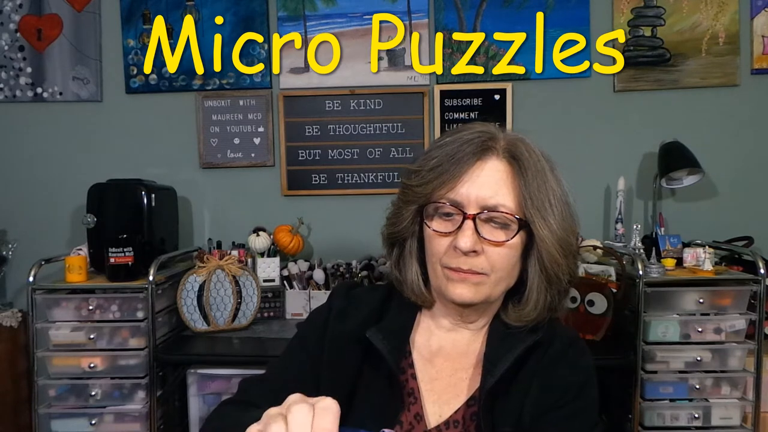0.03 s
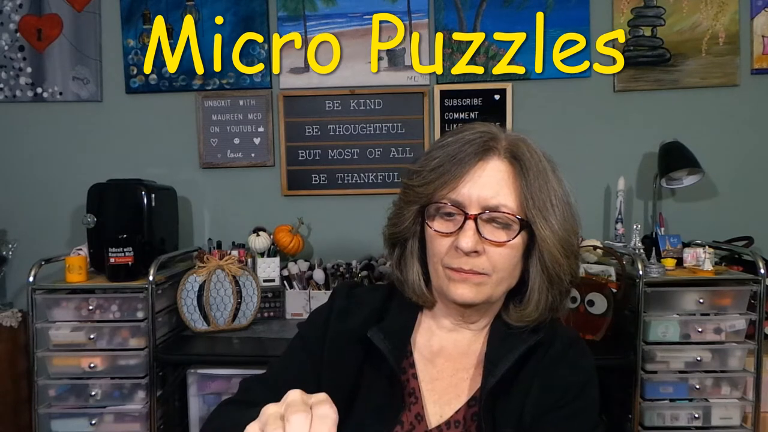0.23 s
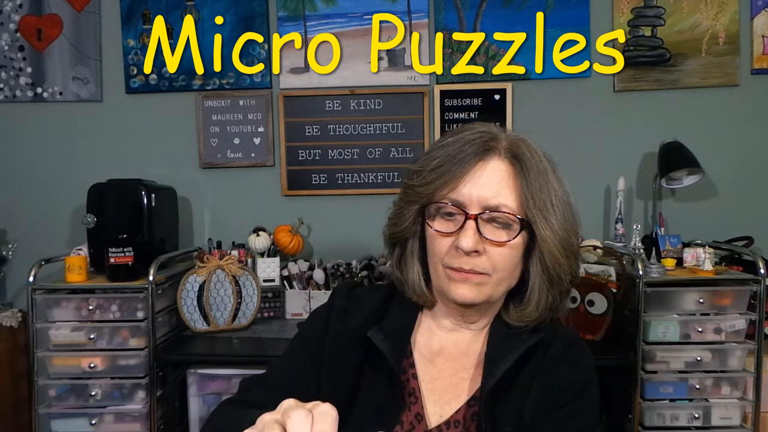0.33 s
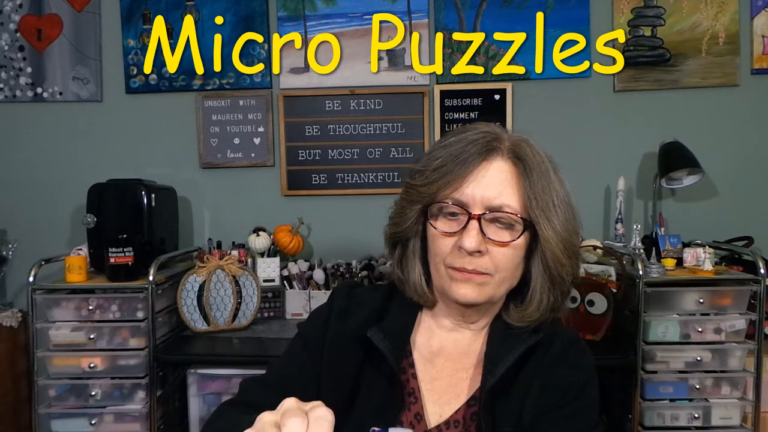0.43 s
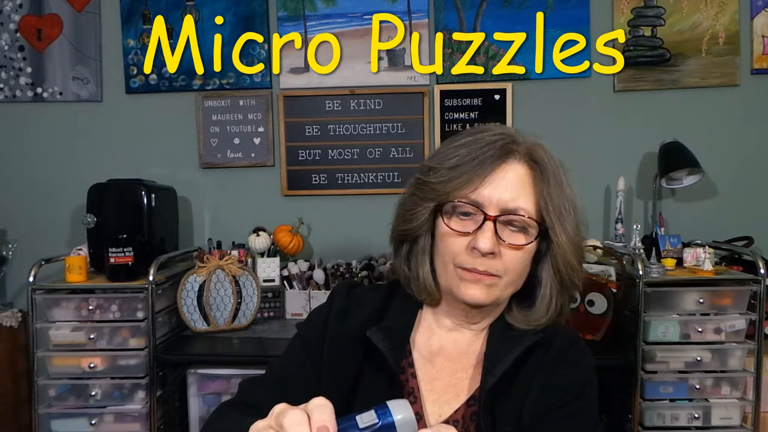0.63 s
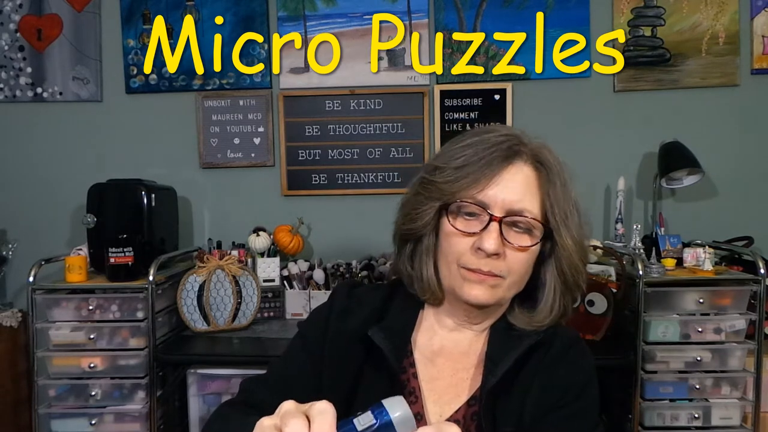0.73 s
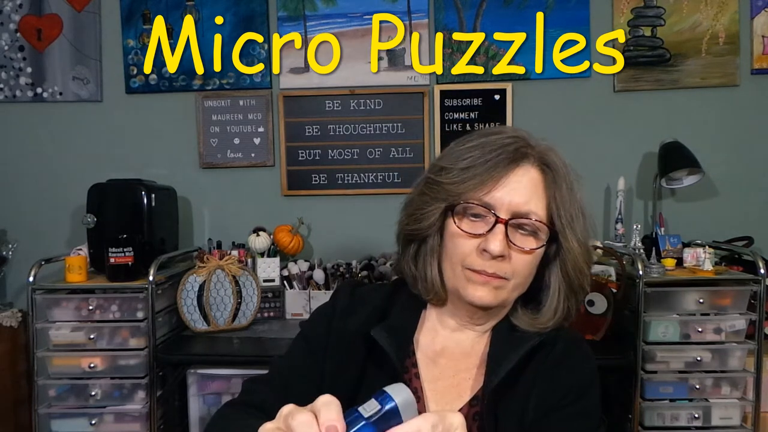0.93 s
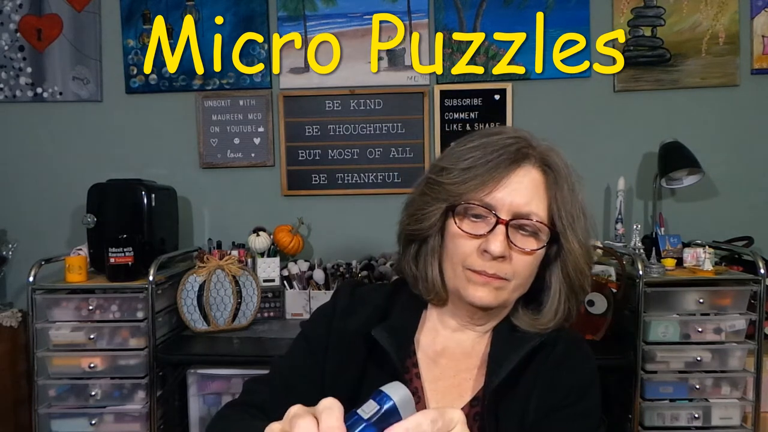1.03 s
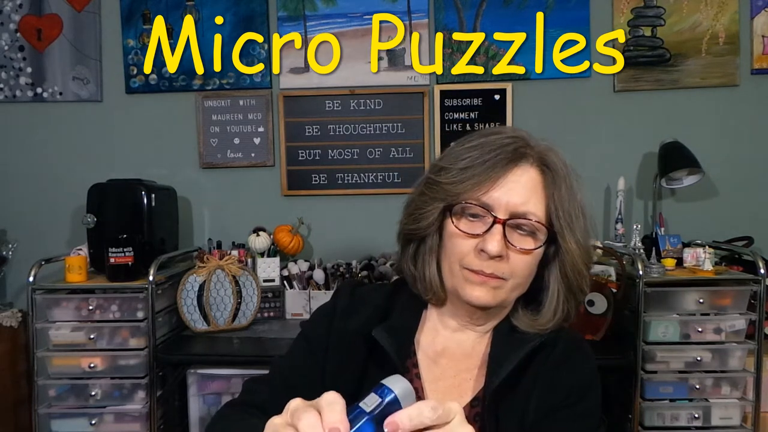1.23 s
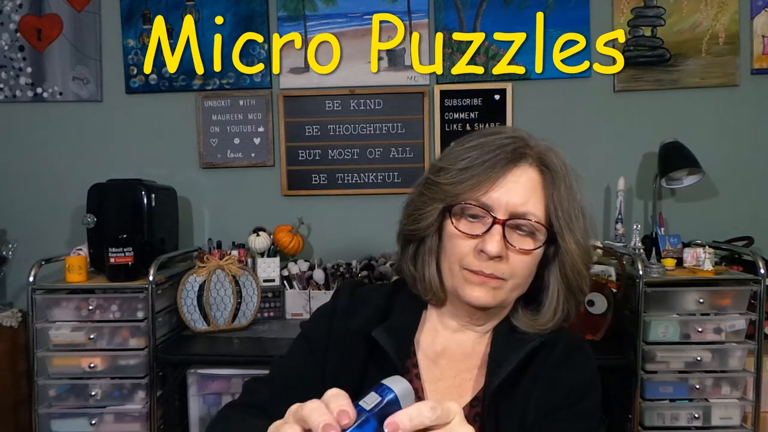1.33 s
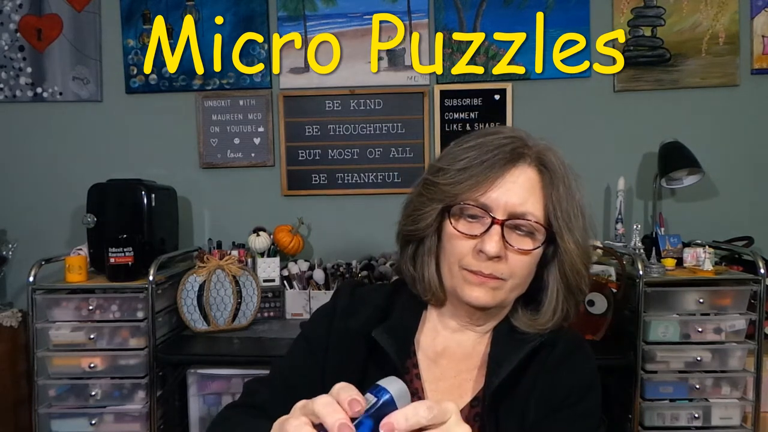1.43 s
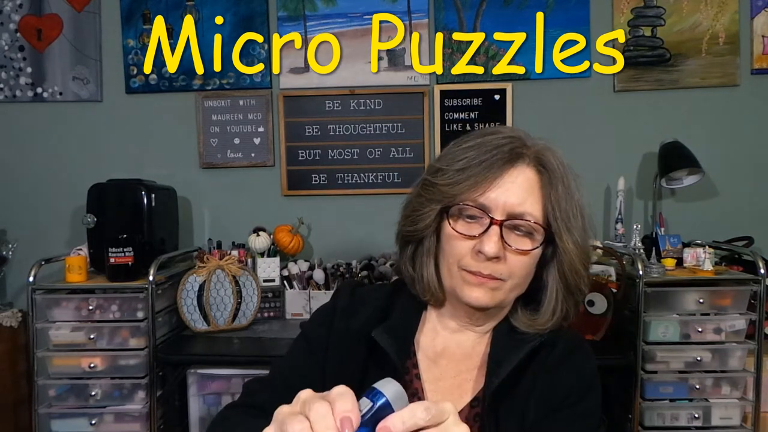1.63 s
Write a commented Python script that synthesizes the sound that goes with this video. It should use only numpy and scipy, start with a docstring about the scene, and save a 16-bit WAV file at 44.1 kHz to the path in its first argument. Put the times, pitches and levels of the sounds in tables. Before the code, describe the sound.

Small hard pieces rattle inside a plastic tube shaken by hand in a quiet room.

```python
"""A quiet room: small hard pieces are tipped to and fro in a hand-held plastic tube, about 3 shakes/s.
Each stroke slides the heap in a surge of tiny collisions. Single pieces clack, runs of them clatter,
and the hollow wall is tapped, knocks and rings. Room air and hand rumble lie underneath.
The sound is close and mono; the bass drops out under the loudest surges."""
import sys
import numpy as np
from scipy import signal
from scipy.io import wavfile
from scipy.ndimage import minimum_filter1d

SR = 44100
rng = np.random.default_rng(int(sys.argv[2]) if len(sys.argv) > 2 else 0)


def bounce(signal):
    """Save signal as a 16-bit WAV file at the path given by the first command-line argument."""
    frames = np.transpose(np.atleast_2d(signal))
    limited = np.clip(frames, -1, 1)
    pcm = np.round(limited * 32767).astype(np.int16)
    wavfile.write(sys.argv[1], SR, pcm)


N = 74970
TICKS_PER_S, SIZE_SPREAD_DB = 2500, 0.5


def amp(db):
    """dB to gain."""
    return 10 ** (np.asarray(db) / 20)


def unit(x):
    """Scale to rms 1."""
    return x / np.sqrt(np.mean(x ** 2) + 1e-20)


def lookup(points, hz):
    """Interpolate (Hz, value) rows over log frequency."""
    points_hz, value = np.transpose(points)
    return np.interp(np.log(hz + 1), np.log(points_hz + 1), value)


def add(mix, start_s, sound):
    """Mix a sound in at start_s."""
    part = mix[max(round(start_s * SR), 0):][:len(sound)]
    part += sound[:len(part)]


def colour(x, spectrum, tilt_db_per_oct=0):
    """Minimum-phase filter to a spectrum, tilted above 1 kHz; output rms 1."""
    hz = abs(np.fft.fftfreq(4096, 1 / SR))
    octaves = np.log2(np.maximum(hz, 1000) / 1000)
    log_gain = np.log(amp(lookup(spectrum, hz) + tilt_db_per_oct * octaves))
    taps = np.fft.ifft(np.exp(np.conj(signal.hilbert(log_gain)))).real[:2048]
    return unit(signal.fftconvolve(x, taps)[:len(x)])


def ring(x, hz, width_hz):
    """One damped resonance."""
    radius, angle = np.exp(-np.pi * width_hz / SR), 2 * np.pi * min(hz, SR / 2) / SR
    return signal.lfilter([1, 0, -1], [1, -2 * radius * np.cos(angle), radius * radius], x)


def collisions(per_s, spread_db=SIZE_SPREAD_DB):
    """Impulses of random time, sign and size; rms 1."""
    size = amp(spread_db * np.minimum(rng.exponential(1, N), 3))
    return unit(size * rng.choice([-1, 1], N) * (rng.random(N) < per_s / SR))


def strike_level(x, db):
    """Scale a strike to the energy of 2.5 ms at rms level db."""
    return amp(db) * x * np.sqrt(0.0025 * SR / np.sum(x ** 2))


def clumps(depth_db=4, step_s=0.017):
    """Randomly wandering gain that bunches the chatter."""
    t = np.arange(N) / SR
    return amp(depth_db * np.interp(t / step_s, np.arange(2000), rng.standard_normal(2000)))


def air_and_hands(air_db=-75, hands_db=-66, start_s=0.037, rise_s=0.12):
    """Steady room noise, plus a soft rumble once the hands move."""
    # Each row, both tables: frequency in Hz, relative noise density in dB.
    air_spectrum = [(25, 2), (80, 0), (160, -3), (400, -11), (1000, -24.5), (4000, -22.5), (14000, -27)]
    hands_spectrum = [(25, -24), (45, -27), (75, 3), (130, 0.5), (250, 0), (500, -5), (1500, -65),
                      (8000, -31)]
    air, hands = rng.standard_normal((2, N))
    moving = np.clip((np.arange(N) / SR - start_s) / rise_s, 0, 1)
    rumble = amp(hands_db) * moving * colour(hands, hands_spectrum)
    return amp(air_db) * colour(air, air_spectrum) + rumble


def tumble():
    """Soft taps of pieces rolling along the wall."""
    # Each row: time in s, relative level in dB.
    envelope = [(0.086, -82.5), (.145, -61.5), (.165, -55.5), (.205, -58.5), (.245, -34.5), (.29, -50),
                (.36, -56.5), (.41, -42), (.55, -44.5), (.68, -46.5), (.76, -46.5), (.82, -47.5),
                (0.869, -39.5), (.93, -48), (1.07, -36.5), (1.19, -46.5), (1.26, -56), (1.32, -42),
                (1.385, -45), (1.48, -80), (1.59, -85), (1.62, -53.5), (1.7, -39.5)]
    # Each row: frequency in Hz, relative density in dB.
    wall_spectrum = [(80, -12), (250, -15.5), (480, -9.5), (640, -10), (850, -1), (1000, 2), (1250, -3.5),
                     (1550, -9.5), (2200, -9.5), (3500, -20), (9000, -20.5)]
    level_db = np.interp(np.arange(N) / SR, *np.transpose(envelope))
    return amp(level_db) * colour(collisions(per_s=700, spread_db=4), wall_spectrum)


def clacks(chatter_decay_s=0.0021, note_decay_s=0.0022, blur=0.086, gain_db=1.5):
    """A hard strike rings one piece; brief chatter blurs its note and adds a broad snap."""
    # Each row: start in s, relative level in dB, ring in Hz, ring width in Hz, snap in dB re the ring.
    strikes = [(0.097, -47.5, 1880, 250, -22), (0.0971, -46, 3700, 600, -27),
               (0.0972, -43.5, 8870, 3500, -4), (0.1039, -46.5, 7970, 4000, -1.5),
               (.1622, -52, 3420, 3000, -4), (0.207, -29.5, 5070, 1100, -27),
               (0.2062, -42, 2950, 1500, -22), (0.23, -35.5, 3100, 1800, -17),
               (0.233, -35, 7930, 1800, -24), (.2420, -30, 7480, 2000, -22), (.3695, -51, 4560, 4030, -9),
               (0.488, -37, 3140, 2000, -5), (0.5044, -37, 4480, 2500, -6), (0.5323, -36, 2020, 1510, -25),
               (0.5355, -31, 7340, 1500, -21), (0.5843, -40, 7570, 1500, -2.5),
               (0.7381, -41, 8600, 1500, -5), (.7498, -36.5, 4800, 900, -7), (0.8388, -34.5, 5100, 900, -6),
               (.8620, -33.5, 3180, 2000, -9), (0.8657, -32, 9620, 1600, -3.5),
               (0.94, -43.5, 2190, 900, -15), (.9570, -41.5, 2160, 900, -10), (1.0125, -39, 3540, 2500, -8),
               (1.0216, -35.5, 4750, 900, -8), (1.043, -32.5, 4260, 2000, 0),
               (1.0581, -27.5, 4220, 700, -10), (1.0636, -28, 4640, 900, -11),
               (1.0751, -34.5, 4740, 1190, 4), (1.1193, -36.5, 3630, 1800, 2),
               (1.1899, -43, 3560, 3000, 4.5), (1.278, -40.5, 1980, 1490, -6),
               (1.285, -50, 2020, 1200, -13), (1.3760, -33, 1990, 1200, -13), (1.385, -44, 8350, 2500, 0),
               (1.3893, -33, 2560, 2000, 2), (1.4852, -50, 2580, 1500, -8), (1.5178, -46, 3520, 1200, -5),
               (1.538, -51.5, 3480, 1200, -14), (1.62, -48, 5130, 2000, 6), (1.6793, -40, 4840, 1230, 2)]
    out, t = np.zeros(N), np.arange(SR // 50) / SR
    for start_s, db, hz, width_hz, snap_db in strikes:
        chatter, snap = rng.choice([-1, 1], (2, len(t))) * np.exp(-t / chatter_decay_s)
        drift_rad = np.cumsum(rng.standard_normal(len(t))) * np.sqrt(blur * 2 * np.pi * width_hz / SR)
        note = np.sin(2 * np.pi * hz * t + drift_rad) * np.exp(-t / note_decay_s)
        body = unit(note) + unit(ring(chatter, hz, width_hz))
        snap = ring(snap, hz=8100, width_hz=9700)
        add(out, start_s, strike_level(body, db + gain_db) + strike_level(snap, db + snap_db + gain_db))
    return out


def knocks(attack_s=0.0005, decay_s=0.0013, gain_db=-3):
    """The heap meets the wall: a hollow note of a few cycles."""
    # Each row: start in s, relative level in dB, pitch in Hz.
    blows = [(0.0977, -55, 1170), (0.2275, -34.5, 1084), (.5312, -32, 856), (.5410, -35.5, 960),
             (0.6238, -38, 960), (0.6442, -39.5, 1025), (0.6995, -29, 1127), (.8618, -36, 800),
             (1.0136, -33, 1050), (1.12, -35, 1240), (1.1657, -37, 1280), (1.1783, -29, 967),
             (1.1905, -37.5, 1140), (1.3359, -32.5, 1120), (1.38, -30, 1210), (1.3890, -33, 1014),
             (1.3947, -33.5, 1230), (1.6195, -42, 1160)]
    out, t = np.zeros(N), np.arange(SR // 40) / SR
    envelope = (1 - np.exp(-t / attack_s)) * np.exp(-t / decay_s)
    for start_s, db, hz in blows:
        add(out, start_s, strike_level(np.sin(2 * np.pi * hz * t) * envelope, db + gain_db))
    return out


def heap(hits_per_s=5400, width_hz=486, tick_share=0.16, crest_s=0.0029, rise_exponent=2.48):
    """Dense collisions, each ringing one piece, swell with a stroke and fade as the heap settles."""
    # Each row: start in s, rise in s, relative crest level in dB, onset in dB below the crest,
    # fall in dB/s, treble tilt in dB/octave.
    surges = [(0.157, 0.07, -46, 13, 151, -5.5), (0.224, 0.018, -36.5, 8, 318, 0.5),
              (0.366, 0.073, -32.5, 26, 146, -0.2), (0.531, 0.012, -38, 24, 798, -2),
              (0.575, 0.023, -48, 13, 161, 1), (0.691, 0.012, -35, 12, 150, 0),
              (0.717, 0.03, -30, 4, 256, -0.1), (0.843, 0.028, -37.5, 8, 166, 0),
              (1.004, 0.002, -39, -2, 150, 3), (1.019, 0.039, -31, 1, 206, -0.3),
              (1.152, 0.033, -40, -1, 161, -0.1), (1.328, 0.054, -27.5, 9, 301, 0),
              (1.461, 0.075, -54.5, -3.5, 124, -3), (1.59, 0.044, -50.5, 6, 448, -2.5),
              (1.68, 0.008, -43, -1, 188, -1.5)]
    # Each row: frequency in Hz, relative density in dB.
    piece_spectrum = [(150, -42), (420, -21.5), (640, -19), (880, -5), (1400, -1), (2000, 2.5), (3200, 0.1),
                      (4700, 1.1), (6000, -1), (7600, 1.5), (11500, -2.4), (14500, -2.3)]
    pitches_hz = np.linspace(900, 15000, 30)
    per_s = hits_per_s / len(pitches_hz)
    pieces = unit(sum(unit(ring(collisions(per_s), hz, width_hz) * clumps()) for hz in pitches_hz))
    grains = np.sqrt(1 - tick_share) * pieces + np.sqrt(tick_share) * collisions(TICKS_PER_S)
    out = np.zeros(N)
    for start_s, rise_s, db, below_db, fall_db_per_s, tilt_db_per_oct in surges:
        t = np.arange(N) / SR - start_s
        swell_db = below_db * np.clip(1 - t / rise_s, 0, 1) ** rise_exponent
        settle_db = fall_db_per_s * (np.hypot(np.maximum(t - rise_s, 0), crest_s) - crest_s)
        slide = colour(np.roll(grains, rng.integers(N)), piece_spectrum, tilt_db_per_oct)
        out += (t > 0) * amp(db - swell_db - settle_db) * slide
    return out


def clatters(width_hz=1100):
    """Like pieces strike in quick succession: one bright note swells and fades."""
    # Each row: start in s, length in s, relative level in dB, ring in Hz.
    runs = [(0.72, 0.021, -38, 7250), (0.736, 0.033, -36, 4820), (0.832, 0.022, -53, 4900),
            (1.048, 0.022, -37, 4360), (1.066, 0.024, -38.5, 5270), (1.387, 0.016, -40, 5250)]
    out = np.zeros(N)
    for start_s, length_s, db, hz in runs:
        run = unit(ring(ring(collisions(TICKS_PER_S), hz, width_hz), hz, width_hz))
        arch = np.sin(np.linspace(0, np.pi, round(length_s * SR)))
        add(out, start_s, amp(db) * unit(arch * run[-len(arch):]))
    return out


def tube(x, coupling_db=0, t60_s=0.045):
    """Direct sound plus the tube's resonances, ringing on after each collision."""
    # Each row: frequency in Hz, gain in dB re the direct sound, before coupling.
    modes = [(450, 3), (500, -6), (724, -5), (868, -2), (972, 1.5), (1128, 0.5), (1220, -1.5), (1272, -3),
             (1368, -6.5), (1863, 1), (2027, -6.5), (2430, -4), (2894, -6), (3440, -5.5), (4319, -6)]
    width_hz = np.log(1000) / np.pi / t60_s
    return x + sum(amp(db + coupling_db) * np.pi * width_hz / SR * ring(x, hz, width_hz)
                   for hz, db in modes)


def room(x, delay_s=0.0055, echoes_per_s=4000, crossfade_s=0.1193):
    """Scattered reflections of a small furnished room; four tails crossfade as the tube moves."""
    # Each row: frequency in Hz, T60 in s.
    decay_times = [(200, 0.39), (1000, 0.15), (4000, 0.14), (14000, 0.15)]
    out = np.zeros(N)
    position = np.arange(N) / SR / crossfade_s
    for k in range(4):
        echoes = rng.choice([-1, 1], SR // 3) * (rng.random(SR // 3) < echoes_per_s / SR)
        hz, t, spectra = signal.stft(echoes, SR, nperseg=256)
        decay = amp(-60 * t / lookup(decay_times, hz)[:, None])
        tail = signal.istft(spectra * decay, SR, nperseg=256)[1]
        share = np.cos(np.pi / 2 * np.minimum(abs((position - k) % 4 - 2), 1))
        add(out, delay_s, signal.fftconvolve(x * share, tail / np.linalg.norm(tail)))
    return out


def duck_bass(x, threshold_db=-34, corner_hz_per_db=87.5, depth_db=40):
    """Bass cut whose corner rises with level."""
    hz, _, spectra = signal.stft(x, SR, nperseg=1024, noverlap=768)
    level_db = 10 * np.log10((abs(spectra) ** 2).sum(1, keepdims=True) * 4 / 3 + 1e-14)
    held_db = -minimum_filter1d(-level_db, size=5, axis=-1)  # peak hold
    corner_hz = np.maximum((held_db - threshold_db) * corner_hz_per_db, 1)
    cut_db = depth_db / (1 + ((hz[:, None] + 20) / corner_hz) ** 12)
    return signal.istft(spectra * amp(-cut_db), SR, nperseg=1024, noverlap=768)[1][:, :N]


def scene():
    """The rattling tube in its room; both channels equal."""
    hits = tube(heap() + clatters() + clacks() + knocks())
    wall_taps = tube(tumble(), coupling_db=0.5)
    rattle = amp(-1.77) * hits + amp(-9.0) * wall_taps
    mono = rattle + amp(-4.5) * room(rattle) + air_and_hands()
    return np.array([mono, mono])


def record(dry):
    """The bass drops out as the rattle gets loud; the highest treble is cut."""
    lowpass = signal.firwin(401, cutoff=14620, window=("kaiser", 8), fs=SR)
    return signal.oaconvolve(duck_bass(dry), lowpass[None], "same")


dry = scene()
out = record(dry)
bounce(out)
```